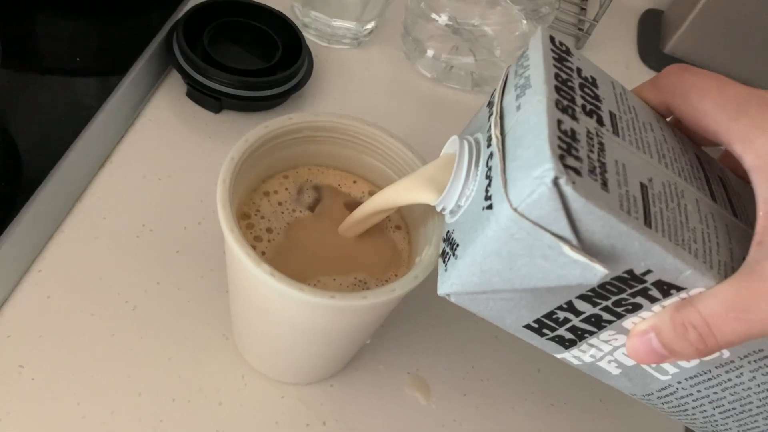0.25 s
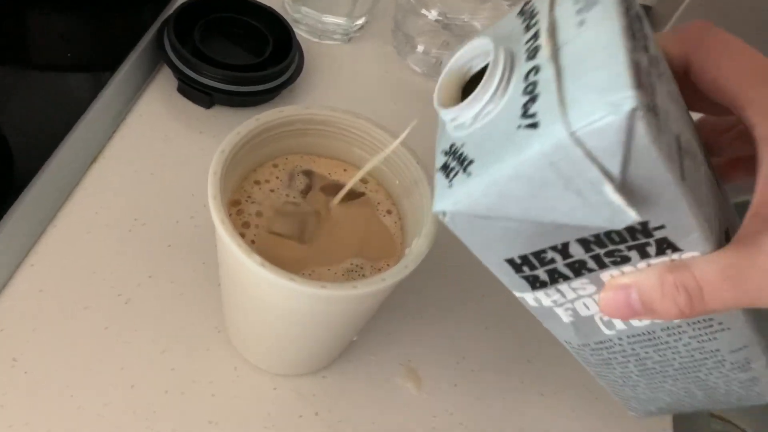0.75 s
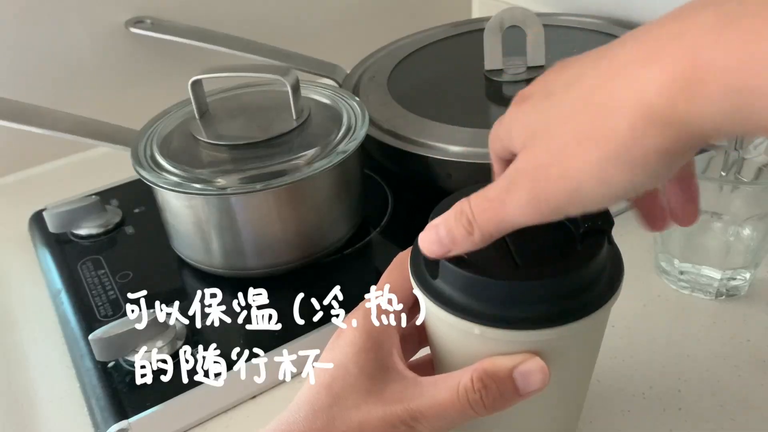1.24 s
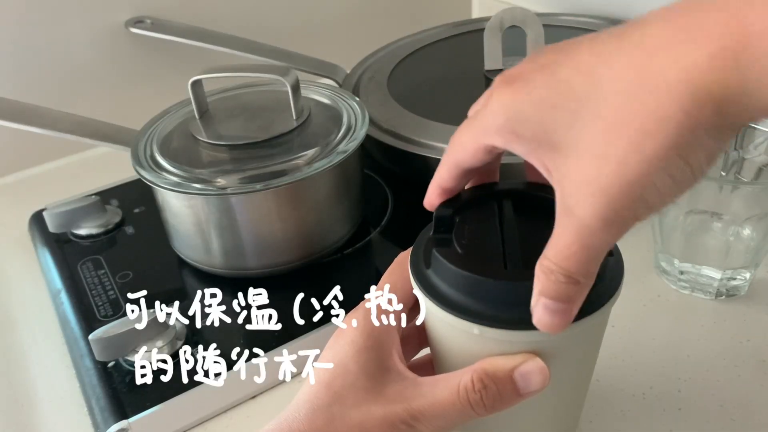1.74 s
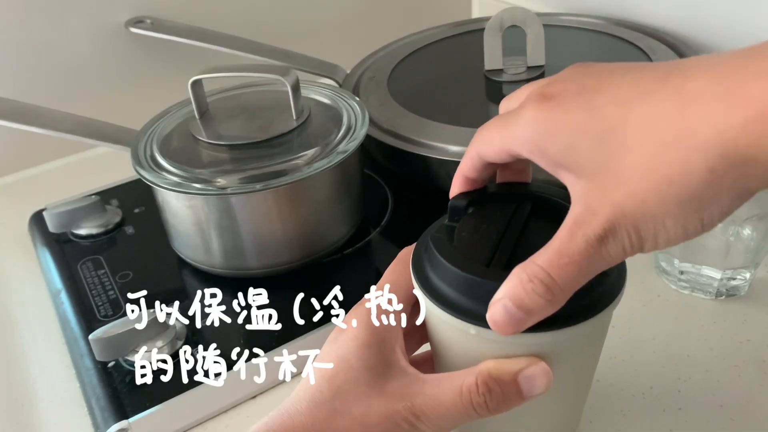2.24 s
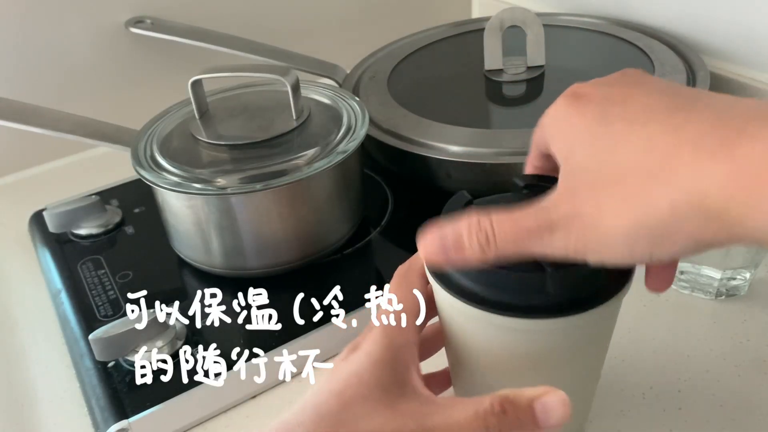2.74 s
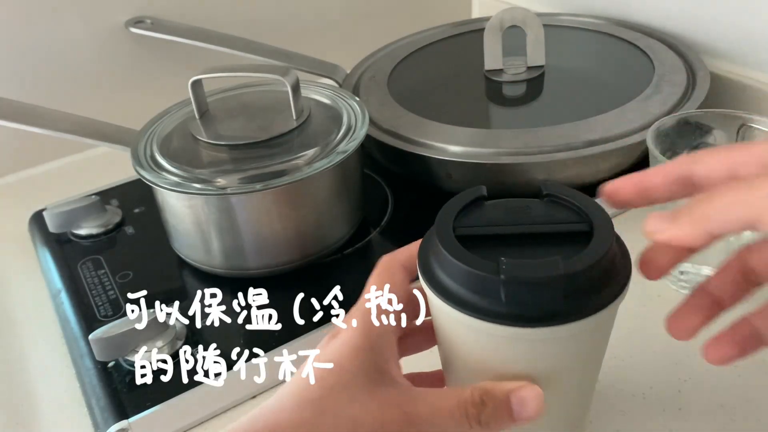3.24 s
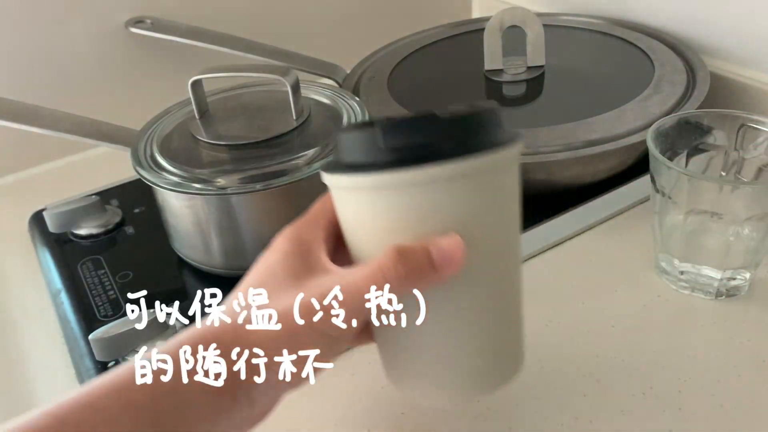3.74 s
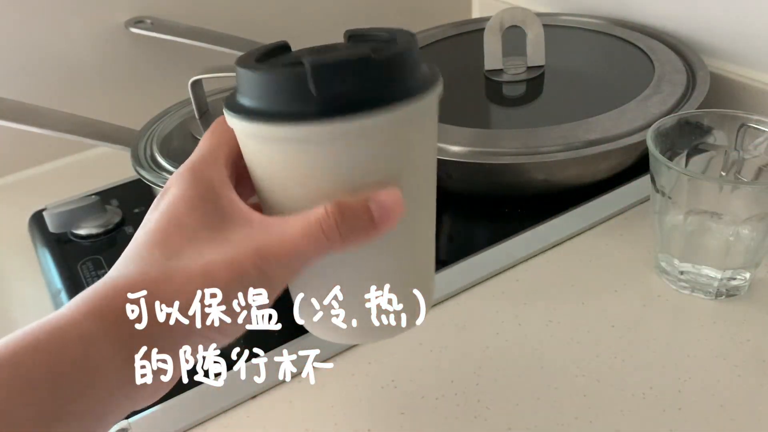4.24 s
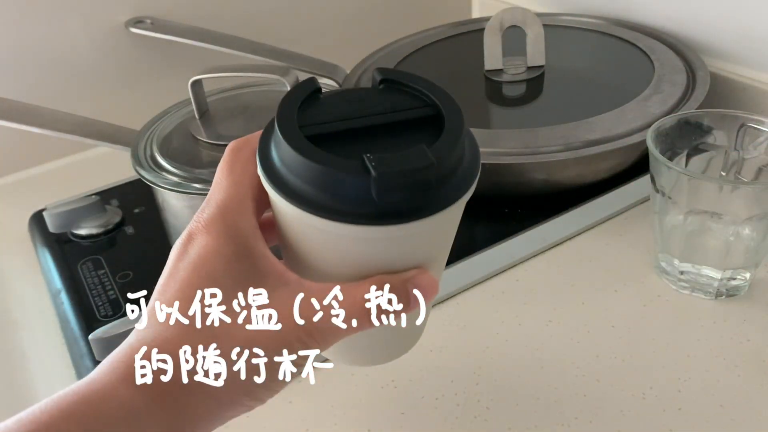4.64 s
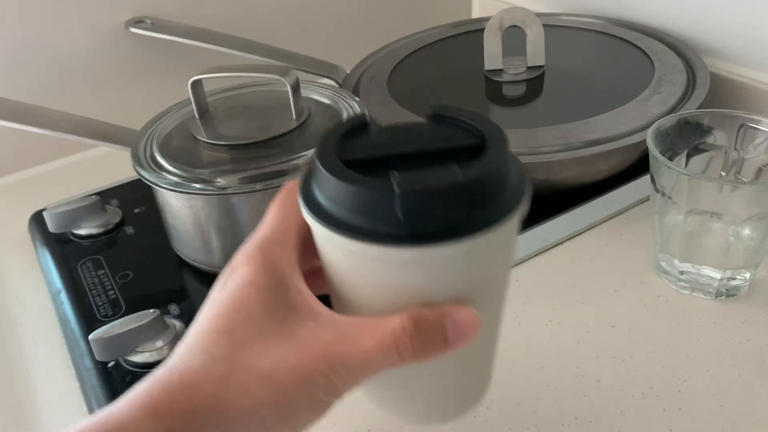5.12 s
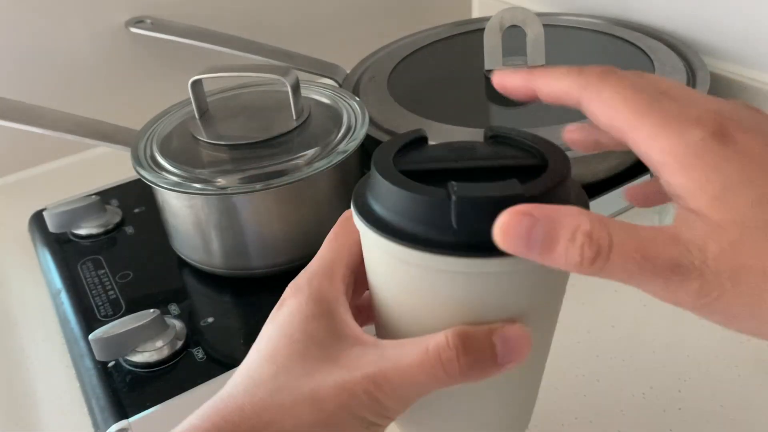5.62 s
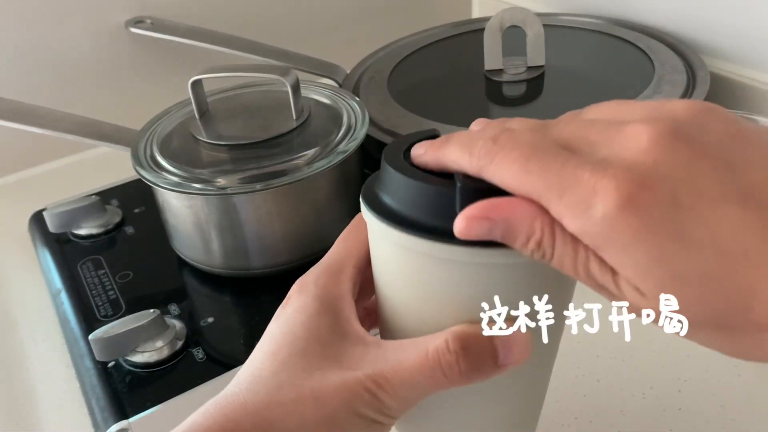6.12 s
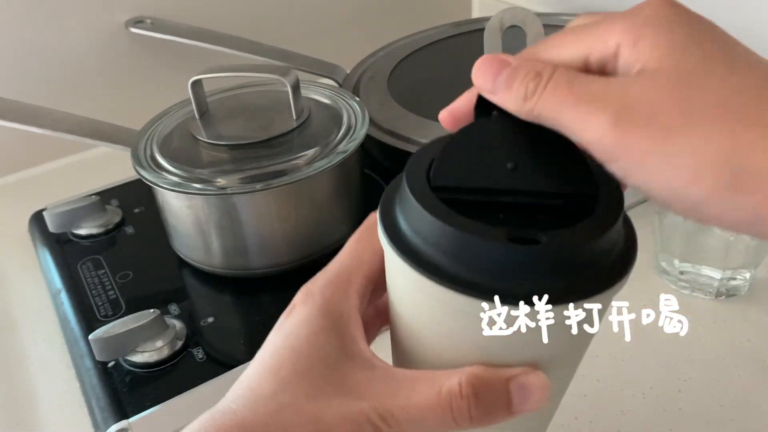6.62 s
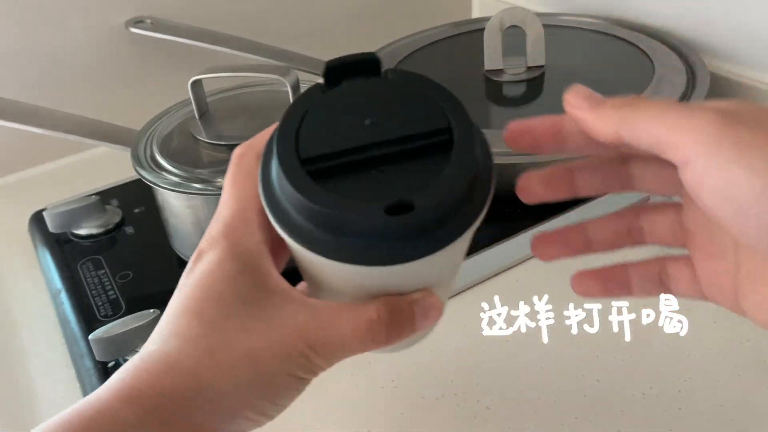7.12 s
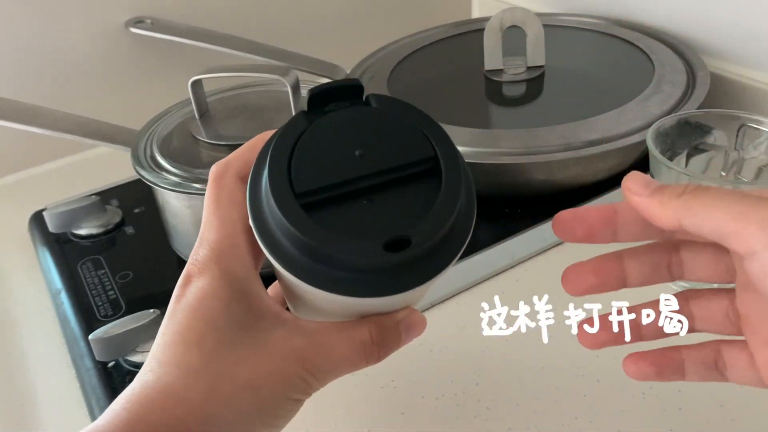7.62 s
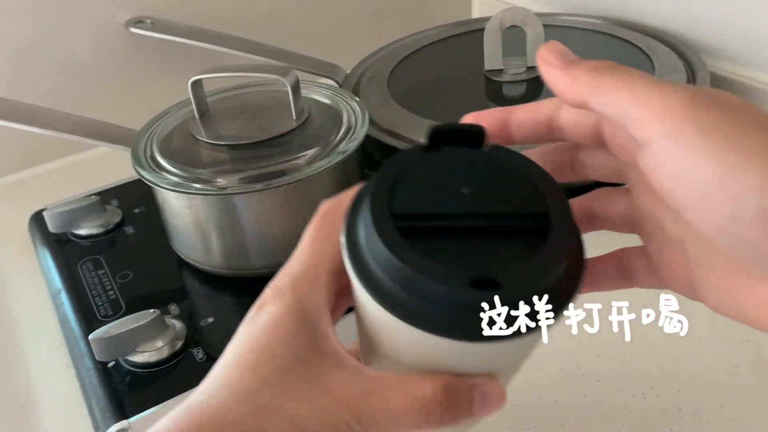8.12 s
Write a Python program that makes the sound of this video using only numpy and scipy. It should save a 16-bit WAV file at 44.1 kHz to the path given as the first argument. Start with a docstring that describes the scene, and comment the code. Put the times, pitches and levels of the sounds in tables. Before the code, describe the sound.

Throughout, a low machine rumble around 60 Hz wavers gently under a soft drone, light hiss and a very thin high whine, in a small kitchen with short dense reflections. From 0 to 0.85 s milk pours very faintly, with bright small clicks near 0.2 and 0.6 s, slightly left. Around 0.85-1.2 s the plastic lid lands on the cup in a tight cluster of hollow knocks, cracks and low thuds, with fingers rubbing; another soft thud comes at 1.4 s. A longer dry rub runs from 2.55 to 2.85 s, then faint taps and short rubs to 3.9 s. A soft low hum sounds at 4.2 s. At 5.62 s a hard, loud knock with quick bounces rings the worktop. At 6.33 s the flap clicks open sharply, followed by light rubbing, then near quiet until small plastic taps at 8.1-8.25 s.

```python
"""Close by in a small kitchen: machinery rumbles throughout under a thin whine, as resonated noise, and milk,
a band of noise, pours faintly at first. A plastic lid is pressed onto an insulated cup and turned: taps ring
lid and hollow cup as decaying modes, fingers rub as dense tiny slips, low modes thud, a faint sine wavers.
Past five and a half seconds something knocks hard on the worktop, ringing it; then the lid's flap clicks open.
Near sounds differ in phase between left and right, and dense reflections of the room follow them."""
import sys
import numpy as np
from scipy import signal
from scipy.fft import rfft, irfft
from scipy.io import wavfile

SR = 44100
rng = np.random.default_rng(int(sys.argv[2]) if len(sys.argv) > 2 else 0)


def to_wav(s):
    """Save 16-bit WAV."""
    ch = np.atleast_2d(s).T  # columns
    pcm = np.round(np.clip(ch, -1, 1) * 32767)  # PCM
    wavfile.write(sys.argv[1], SR, pcm.astype(np.int16))


N = 368676

AHEAD_PAN_DB = 1   # left over right, for sounds from ahead


def amp(db):
    """Decibels to gain."""
    return 10 ** (np.asarray(db) / 20)


def rms_one(x):
    """Scale to rms 1."""
    return x / np.sqrt(np.mean(x ** 2) + 1e-20)


def peak_one(x):
    """Scale to peak 1."""
    return x / (np.max(np.abs(x)) + 1e-12)


def in_time(rows):
    """Columns of a curve table, sample by sample."""
    s, *columns = np.transpose(rows)
    return [np.interp(np.arange(N) / SR, s, column) for column in columns]


def at_hz(points, hz):
    """Read a two-column spectrum on a log-frequency axis."""
    point_hz, value = np.array(points).T
    return np.interp(np.log(hz + 1), np.log(point_hz + 1), value)


def colour(x, spectrum):
    """Filter a signal by the spectrum of a table."""
    hz = np.arange(x.shape[-1] // 2 + 1) * SR / x.shape[-1]
    return irfft(rfft(x) * amp(at_hz(spectrum, hz)), x.shape[-1])


def band(x, low_hz, high_hz):
    """Butterworth band-pass."""
    return signal.sosfilt(signal.butter(2, [low_hz, high_hz], "band", fs=SR, output="sos"), x)


def drift(rate_hz):
    """Slow random wander of spread 1: noise twice through a one-pole low-pass, one point per 40 samples."""
    pole = np.exp(-80 * np.pi * rate_hz / SR)
    noise = rng.standard_normal(N // 40 + 2002)
    slow = signal.lfilter([1], [1, -2 * pole, pole * pole], noise)[2000:]
    return np.interp(np.arange(N) / 40, np.arange(len(slow)), rms_one(slow))


def ring(x, hz, t60_s):
    """One decaying mode: a two-pole resonator losing 60 dB in t60_s."""
    r, w = amp(-60 / (t60_s * SR)), 2 * np.pi * hz / SR
    return signal.lfilter([0, np.sin(w)], [1, -2 * r * np.cos(w), r * r], x)


def stereo_noise():
    """White noise on two channels, as alike at each frequency as the table says."""
    # likeness of left and right: (f/Hz, correlation from -1 to 1)
    likeness = [(60, 0.99), (130, 0.94), (290, 0.86), (640, 0.4), (1410, 0.02), (3100, 0.04), (6820, -0.2),
                (15000, 0.82)]
    mid, side = rfft(rng.standard_normal((2, N)))
    alike = np.clip(at_hz(likeness, np.arange(len(mid)) * SR / N), -1, 1)
    opposed = np.array([[1], [-1]])
    return irfft(np.sqrt(1 + alike) * mid + np.sqrt(1 - alike) * side * opposed, N)


def resonate(x, peaks):
    """Noise twice through each resonance, in parallel with alternating sign; rms 1."""
    lead_in = SR // 4   # lets the resonances build up before the start
    x = np.c_[x[:, -lead_in:], x]
    out = 0
    for k, (hz, width_hz, level_db) in enumerate(peaks):
        r = np.exp(-np.pi * width_hz / SR)
        sos = [[0.99, 0.0016, -1, 1, -2 * r * np.cos(2 * np.pi * hz / SR), r * r]] * 2
        resonance = rms_one(signal.sosfilt(sos, x)[:, lead_in:])
        out = out + (-1) ** k * amp(level_db) * resonance
    return rms_one(out)


def add(out, sound, s, pan_db):
    """Place a sound at a time, its left channel pan_db over its right."""
    at = round(s * SR)
    panned = amp([[pan_db / 2], [-pan_db / 2]]) * sound
    out[:, at:at + len(sound)] += panned[:, :N - at]


def rattle(t60_s, size):
    """A first contact, then a noisy rattle that rises within 1.8 ms and dies away."""
    t = np.arange(size) / SR
    burst = rng.standard_normal(size) * amp(-60 * t / t60_s) * np.minimum(t / 0.0018, 1)
    burst[0] = 2.2   # first contact, against a rattle of spread 1
    return burst


def machinery():
    """Rumble and drone are noise in room and casing resonances; hiss and whine lie above."""
    # machinery level before its flutter: (t/s, rumble level/dB, drone level/dB)
    machine_levels = [(0.0, -45.5, -52), (0.25, -41.5, -55.5), (0.56, -37.5, -55), (1.21, -45.5, -57),
                      (1.61, -39.5, -61), (3.51, -43.5, -60), (3.63, -40, -59.5), (5.33, -42.5, -58.5),
                      (5.78, -36.5, -58), (6.17, -45.5, -60.5), (7.5, -42, -61.5), (8.36, -42, -62)]
    # low resonances: (f/Hz, width/Hz, relative level/dB)
    rumble_peaks = [(56.56, 19.5, 3.5), (59.5, 4.45, 0), (72.4, 68, -22), (122.1, 19.6, -17)]
    # middle resonances: (f/Hz, width/Hz, relative level/dB)
    drone_peaks = [(281.5, 29, -1.5), (350, 166, -18), (421.7, 40, -8), (222, 230, -11.5), (657, 39, -16),
                   (862, 290, -12)]
    # spectrum of the hiss: (f/Hz, relative level/dB per Hz)
    hiss_spectrum = [(290, -31), (500, -5), (787, -14), (1020, -12.5), (1300, -13.5), (1600, -13),
                     (1950, -20), (2500, -21), (3200, -26), (5000, -33), (7200, -32), (8540, -41),
                     (11600, -29), (13600, -50), (16500, -53)]
    # hiss level before its drift: (t/s, level/dB)
    hiss_levels = [(0, -68), (3, -68.5), (6.5, -69), (7.2, -71), (7.9, -71), (8.36, -69.5)]
    # the one whine resonance: (f/Hz, width/Hz, relative level/dB)
    whine_peak = (15350, 150, 0)
    drone_lag_s = .00042   # the right channel's drone is later than the left's
    whine_db = -76.5

    rumble_db, drone_db = in_time(machine_levels)
    rumble = amp(rumble_db + 1.92 * drift(5.6)) * resonate(stereo_noise(), rumble_peaks)
    drone = amp(drone_db + 2.7 * drift(27)) * resonate(stereo_noise(), drone_peaks)
    drone[1] = np.roll(drone[1], round(drone_lag_s * SR))
    hiss_db = in_time(hiss_levels)[0] + drift(6) + drift(.8)
    hiss = amp(hiss_db) * rms_one(colour(stereo_noise(), hiss_spectrum))
    whine = amp(whine_db + 0.83 * drift(40)) * resonate(stereo_noise(), [whine_peak])
    right_lean = amp([[-.4], [.4]])
    return right_lean * (rumble + drone) + hiss + whine


def pouring():
    """Milk pouring gently: a faint, uneven band of noise that fades out quickly at 0.85 s."""
    level_db, until_s, low_hz, high_hz = -73, .85, 1400, 4200
    flowing = np.clip((until_s - np.arange(N) / SR) / .03, 0, 1)   # the last 30 ms fade
    return amp(level_db + 2 * drift(5.9)) * flowing * rms_one(band(stereo_noise(), low_hz, high_hz))


def kitchen(x):
    """Dense reflections: octave bands of noise, each dying at its own rate, starting after 3 ms."""
    # the room's reverberation: (f/Hz, t60/s, band gain/dB)
    room_bands = [(100, 0.25, -2.5), (500, 0.25, -7), (1560, 0.23, -4.5), (3180, 0.16, -2),
                  (8000, 0.15, -3)]
    t, walls = np.arange(SR // 2) / SR, 0
    hz, t60_s, level_db = np.transpose(room_bands)
    for low in 60 * 2. ** np.arange(8):
        tail = band(stereo_noise()[:, :SR // 2], low, 2 * low)
        centre = np.sqrt(2) * low
        gain_db = at_hz(np.c_[hz, level_db], centre)
        decay_db = 60 * t / at_hz(np.c_[hz, t60_s], centre)
        walls = walls + tail * amp(gain_db - decay_db) * (t > .003)
    walls = walls / np.sqrt(np.sum(walls ** 2) / 2)   # unit energy per channel, on average
    return signal.fftconvolve(x[None], walls, axes=1)[:, :N]


def faint_tone():
    """A faint short sine near 4.3 kHz, its pitch wavering."""
    # the tone: (t/s, length/s, f/Hz, peak level before panning/dB)
    tone_row = (3.268, .05, 4300, -75)
    s, length_s, hz, peak_db = tone_row
    out, size = np.zeros((2, N)), round(length_s * SR)
    wavering_hz = hz * (1 + 0.02 * drift(60)[:size])
    tone = np.sin(2 * np.pi * np.cumsum(wavering_hz) / SR)
    add(out, amp(peak_db) * np.sqrt(np.hanning(size)) * tone, s, AHEAD_PAN_DB)
    return out


def thuds():
    """Low thuds, two of them under the hard knock, and one soft low hum at 4.2 s: a push rings one mode."""
    # thuds and hum: (t/s, peak level before panning/dB, f/Hz, t60/s)
    thud_rows = [(0.862, -52, 134, .1), (1.114, -31, 103, 0.081), (1.422, -28.5, 84, 0.1),
                 (1.919, -36.5, 125, 0.069), (2.192, -46.5, 123, 0.074), (3.002, -35.5, 126, 0.19),
                 (4.2, -40.5, 276, 0.48), (5.629, -23, 112, 0.37), (5.657, -24.5, 80.8, 0.29),
                 (6.336, -24.5, 116, 0.024)]
    out = np.zeros((2, N))
    push = np.r_[np.hanning(200), np.zeros(20000)]
    for s, peak_db, hz, t60_s in thud_rows:
        add(out, amp(peak_db) * peak_one(ring(push, hz, t60_s)), s, pan_db=-1.0)
    return out


def knock():
    """The hard knock and its bounces: each rings the worktop's modes and shakes a clatter loose."""
    # bounces: (t/s, reference level/dB; the body peaks 5 dB below it, the clatter 15 dB)
    bounces = [(5.6195, -11.5), (5.624, -7.5), (5.633, -10.5), (5.64, -15), (5.657, -25)]
    # modes of the worktop: (f/Hz, relative peak level/dB, t60/s)
    worktop_modes = [(289, -6.5, 0.18), (448.4, 3.5, 0.048), (665, -5, 0.085), (672, 4, 0.07),
                     (732, -5, 0.073), (905, -0.5, 0.067), (994, -4, 0.045), (1185, -7, 0.08),
                     (1347, -8.5, 0.044), (1544, -7, 0.066), (1720, -14.5, 0.035)]
    # spectrum of the clatter: (f/Hz, relative level/dB per Hz)
    clatter_spectrum = [(76, -37), (130, -12), (183, -37), (430, 1), (571, -20.5), (658, -18), (789, -12.5),
                        (1600, -9), (5520, -32.5), (8630, -46.5), (10400, -38), (15500, -57), (16500, -59)]
    out, size = np.zeros((2, N)), 20000
    t = np.arange(size) / SR
    clatter_envelope = amp(-60 * t / 0.31) * np.minimum(t / 0.00079, 1)   # t60 and rise in s
    for s, level_db in bounces:
        hit = rattle(0.032, size)
        body = sum(amp(mode_db) * peak_one(ring(hit, hz, t60_s)) for hz, mode_db, t60_s in worktop_modes)
        clatter = colour(rng.standard_normal(size), clatter_spectrum) * clatter_envelope
        sound = amp(level_db - 5.0) * peak_one(body) + amp(level_db - 15) * peak_one(clatter)
        add(out, sound, s, pan_db=3.0)
    return out


def stroke(start_s, length_s, level_db):
    """Pressure of one stroke: it builds, eases through the stroke, then the fingers let go."""
    rise_s, rise_db = .05, 22
    sag_db_per_s, release_db_per_s = 65, 240
    t = np.arange(N) / SR - start_s
    rising_db = rise_db * np.minimum(t / rise_s - 1, 0)
    sagging_db = sag_db_per_s * np.maximum(t - rise_s, 0)
    release_db = release_db_per_s * np.maximum(t - length_s, 0)
    return amp(level_db + rising_db - sagging_db - release_db)


def rubbing():
    """Dense tiny slips of skin on plastic, clumped, under each stroke."""
    # strokes of the fingers: (t/s, length/s, level at full pressure/dB)
    strokes = [(0.84, 0.06, -88), (1.055, 0.16, -57.5), (1.4, 0.1, -65), (2.073, 0.11, -78.5),
               (2.557, 0.27, -54.5), (2.927, 0.21, -68.5), (3.323, 0.09, -69), (3.431, 0.054, -63.5),
               (6.345, 0.35, -68), (6.468, 0.074, -68), (6.676, 0.14, -71.5), (6.796, 0.38, -75.5),
               (8.128, 0.1, -69), (8.246, .2, -74.5)]
    # spectrum of the rubbing noise: (f/Hz, relative level/dB per Hz)
    rub_spectrum = [(500, -25), (760, -14), (890, -4.5), (1050, -1), (1300, -11), (1570, -7.5),
                    (1800, -11.5), (2500, -13), (2930, -16.5), (3290, -11), (3900, -13), (4900, -18),
                    (6300, -18), (7500, -22), (8600, -40), (10000, -18.5), (13300, -25), (15200, -15),
                    (16500, -35)]
    slips_per_s, slip_spread_db, clumps_db = 6000.0, 4.3, 3   # unevenness of single slips and of clumps
    treble_hz, dulling = 4860, 0.15   # lighter pressure rubs duller above this

    happens = rng.random(N) < slips_per_s / SR
    slip_size = amp(slip_spread_db * np.minimum(rng.exponential(1, N), 4))
    slips = happens * slip_size * rng.choice([-1, 1], N)
    grain = rms_one(colour(slips, rub_spectrum)) * amp(clumps_db * drift(40))
    pressure = sum(stroke(*row) for row in strokes)
    treble_gain = (pressure / pressure.max()) ** dulling
    treble = signal.sosfilt(signal.butter(2, treble_hz, "high", fs=SR, output="sos"), grain)
    body = signal.sosfilt(signal.butter(2, treble_hz, fs=SR, output="sos"), grain)
    # the two halves are in opposite phase at the crossover, hence the minus
    return pressure * (body - treble_gain * treble) * np.ones((2, 1))


def taps():
    """Each tap rings the lid's modes near its centre, booms in the cup and cracks in the treble."""
    # taps and clicks, peak levels before panning:
    # (t/s, lid level/dB, centre of the lid's ring f/Hz, cup boom level/dB, crack level/dB)
    tap_rows = [(0.144, -42, 3600, -49, -47), (0.173, -31, 2900, -57, -57), (0.178, -28.5, 2570, -56, -37),
                (0.188, -38, 3000, -60, -53), (0.197, -21, 2400, -41, -41), (0.202, -43, 3200, -51, -58),
                (0.388, -37, 1540, -52, -74), (0.602, -37.5, 3880, -40.5, -48),
                (0.61, -25.5, 2340, -69, -59), (0.831, -54, 3030, -61, -49), (0.843, -51, 3050, -55, -52),
                (0.855, -33, 1170, -22.5, -38), (0.865, -28, 1210, -23.5, -22.5),
                (0.881, -29.5, 1560, -22, -51), (0.909, -26.5, 1900, -24, -24.5),
                (1.075, -26.5, 1450, -34, -42), (1.101, -38.5, 1010, -22, -22.5),
                (1.111, -28, 1220, -49, -50), (1.124, -52, 1230, -32, -37), (1.148, -52, 1230, -33, -39),
                (1.162, -43, 1300, -43, -39), (1.174, -45, 1520, -29, -40), (1.19, -41, 1290, -33.5, -55),
                (1.213, -27.5, 1950, -26, -39), (1.375, -37, 1240, -35.5, -49),
                (1.421, -46.5, 1220, -38.5, -59), (1.62, -79, 945, -43.5, -62.5),
                (1.685, -44.5, 1490, -43, -72), (2.09, -59.5, 1690, -54, -58),
                (2.233, -53.5, 1160, -48, -68), (2.711, -43, 1270, -45.5, -72), (2.755, -50, 915, -59, -75),
                (2.814, -45.5, 1200, -50, -76), (2.989, -56, 960, -40.5, -77), (3.070, -54, 890, -54, -70),
                (3.23, -59.5, 3180, -62, -65), (3.383, -49.5, 894, -54, -82), (3.417, -56, 886, -57, -78),
                (3.499, -41, 2390, -72, -67), (3.745, -54, 1220, -57, -68), (3.909, -38.5, 2920, -84, -52),
                (5.452, -50, 850, -62, -53), (5.512, -47.5, 1620, -74, -64), (6.102, -50, 2170, -54, -69),
                (6.326, -47, 3200, -61.5, -52), (6.331, -30.5, 3270, -58, -34),
                (6.337, -30.5, 1880, -45, -18.5), (6.341, -20.5, 3370, -32.5, -51),
                (6.349, -27.5, 3800, -31.5, -50), (6.438, -46.5, 2220, -61, -74),
                (6.627, -43.5, 3130, -47.5, -45), (7.419, -60, 2600, -70, -75),
                (6.739, -52.5, 870, -72, -60), (8.065, -49.5, 2550, -59, -66),
                (8.087, -33, 2410, -44.5, -49), (8.178, -44, 2520, -50, -54),
                (8.228, -45.5, 1200, -58, -66)]
    # modes of the plastic lid: (f/Hz, relative peak level/dB, t60/s)
    lid_modes = [(900, 0, .02), (1230, 0, .012), (1580, 1, .012), (1850, 0, .008), (2200, 0, .006),
                 (2650, -1, .004), (3200, -3, .003), (3900, -1, .003), (4700, -1, .002), (5700, -3, .002),
                 (6900, -3, .002)]
    # modes of the hollow cup: (f/Hz, relative drive level/dB, t60/s)
    cup_modes = [(112, -2.5, 0.085), (282.4, -11.5, 0.12), (343.6, 3.5, 0.029), (437.6, -6, 0.05),
                 (552, -10.5, 0.024)]
    # spectrum of the crack: (f/Hz, relative level/dB per Hz)
    crack_spectrum = [(2000, -23), (3500, -9), (5000, 1.5), (7100, 29), (8400, 13), (10500, 26),
                      (13300, 15.5), (15500, 19.5), (16500, -6.5)]
    rattle_t60_s, crack_t60_s, size = .019, .011, 6000
    left_until_s, left_pan_db, left_top_hz = .8, 7, 8000   # first taps: from the left, with a duller crack
    ring_fall_db_per_octave = 14.5   # modes far from the struck spot's centre ring less
    # softer taps ring a narrower range: extra dB per octave for each dB below
    soft_below_db, soft_narrowing = -34, .9

    out = np.zeros((2, N))
    crack_filter = colour(np.eye(1, 128, 64)[0], crack_spectrum)
    for s, lid_db, centre_hz, cup_db, crack_db in tap_rows:
        from_left = s < left_until_s
        hit = rattle(rattle_t60_s, size)
        # every contact point favours other modes
        strength_db = rng.normal(0, 3, len(lid_modes) + len(cup_modes))

        fall_db = ring_fall_db_per_octave + soft_narrowing * max(soft_below_db - lid_db, 0)
        lid = 0
        for k, (hz, mode_db, t60_s) in enumerate(lid_modes):
            near_db = mode_db - fall_db * abs(np.log2(hz / centre_hz))
            lid = lid + amp(near_db + strength_db[k]) * peak_one(ring(hit, hz, t60_s))
        # the softest taps end at a multiple of their centre
        top_hz = 1.9 * centre_hz if lid_db < soft_below_db - 6 else 8100
        lid = band(band(lid, 773, top_hz), 773, top_hz)

        cup = 0
        for k, (hz, mode_db, t60_s) in enumerate(cup_modes):
            cup = cup + amp(mode_db + strength_db[-1 - k]) * ring(hit, hz, t60_s)
        cup = band(cup, 222, 670)

        crack = np.convolve(rattle(crack_t60_s, size), crack_filter)[64:64 + size]
        if from_left:
            crack = band(band(crack, 2000, left_top_hz), 2000, left_top_hz)

        add(out, amp(lid_db) * peak_one(lid), s, left_pan_db if from_left else AHEAD_PAN_DB)
        add(out, amp(crack_db) * peak_one(crack), s, pan_db=2.5)
        add(out, amp(cup_db) * peak_one(cup), s, pan_db=3.0)
    return out


def scene():
    """Near sounds, shifted in phase between left and right, and their room, over machinery and pouring."""
    # phase between left and right in the near sounds: (f/Hz, phase by which the left leads/rad)
    left_lead = [(0, 0), (950, 0.3), (2070, 0), (2900, 1.3), (5500, 1.5), (6200, -0.3), (6900, -0.8),
                 (8100, -2.9), (9100, -3.5), (10300, -5.7), (11200, -6.4), (12800, -8.9), (14000, -9.8),
                 (15100, -12.2), (16700, -12.5)]
    kitchen_db = -3
    drier_room_db = -1   # the lid is near and sounds drier than the knock and thuds

    drier = taps() + rubbing() + faint_tone()
    roomier = knock() + thuds()
    left, right = drier + roomier
    room_feed = (amp(drier_room_db) * drier + roomier).mean(axis=0)
    wet = amp(kitchen_db) * kitchen(room_feed)
    lag = at_hz(left_lead, np.arange(N // 2 + 1) * SR / N)
    right = irfft(rfft(right) * np.exp(-1j * lag), N)
    return np.array([left, right]) + wet + machinery() + pouring()


def record(dry):
    """A steep elliptic low-pass cuts the top above 16 kHz."""
    return signal.sosfilt(signal.ellip(10, .5, 80, 16000, fs=SR, output="sos"), dry)


dry = scene()
out = record(dry)
to_wav(out)
```